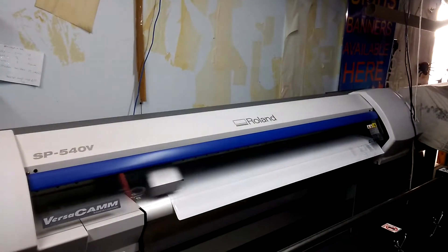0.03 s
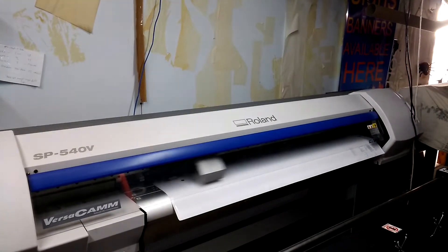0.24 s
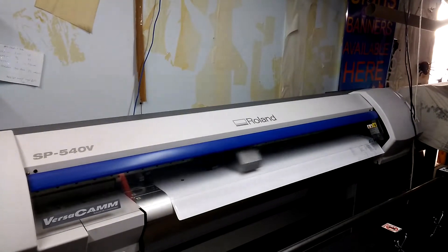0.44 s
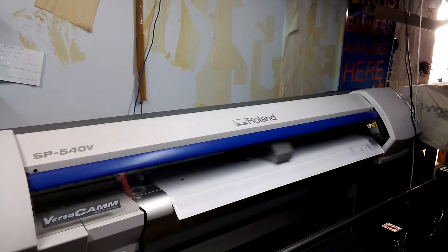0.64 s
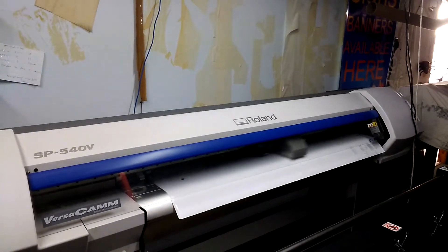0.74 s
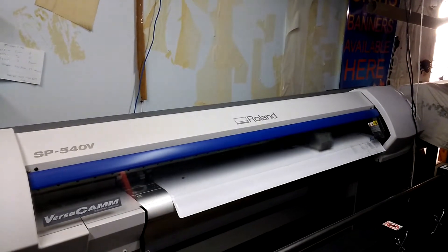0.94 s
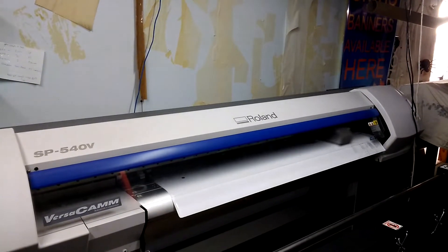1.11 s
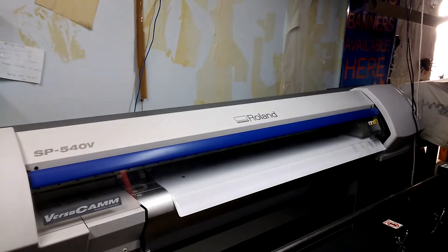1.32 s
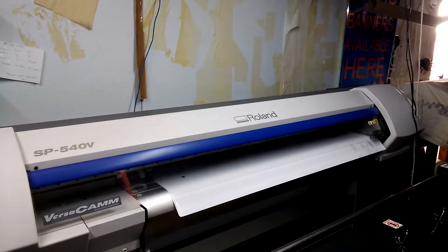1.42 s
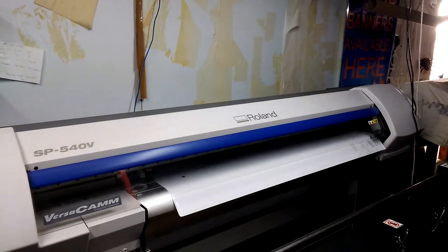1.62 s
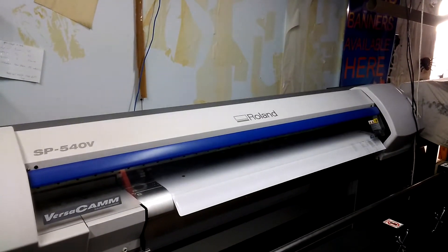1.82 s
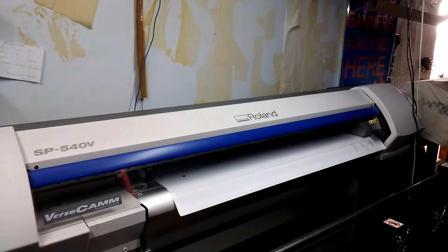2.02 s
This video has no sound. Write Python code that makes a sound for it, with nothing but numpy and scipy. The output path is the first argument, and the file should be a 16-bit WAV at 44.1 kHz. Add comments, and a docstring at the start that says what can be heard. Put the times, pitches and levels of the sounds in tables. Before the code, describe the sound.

Large-format printer carriage sweeping with rough whir and thin whine, stopping shortly before its next pass

```python
"""The carriage of a wide-format inkjet printer runs along its rail, brakes, rests briefly and sets off again.
Its bearings are shaped noise; belt and gears add a rough whir that rings in the housing, and a faint gear whine
of two tones swells at every turn of the pulley. Panels drone in short wavering tones as the carriage passes.
Around the pause the media feed motor blips, then the carriage motor chirps upward as it spins up.
A quiet fan and the shop lie underneath; the left and right microphones hear each source differently."""
import sys
import numpy as np
from scipy import signal
from scipy.fft import rfft, irfft, next_fast_len
from scipy.io import wavfile

SR = 44100
rng = np.random.default_rng(int(sys.argv[2]) if len(sys.argv) > 2 else 0)


def output_pcm(signal):
    """Save a mono or channel-first signal as 16-bit PCM at the path in sys.argv[1].

    Samples are clipped to [-1, 1] before scaling.
    """
    pcm = np.clip(np.atleast_2d(signal).T, -1, 1) * 32767
    wavfile.write(sys.argv[1], SR, np.round(pcm).astype(np.int16))


N = 90713
T = np.arange(N) / SR
BINS = np.fft.rfftfreq(N, 1 / SR)


def from_db(db):
    """Decibels to amplitude gain."""
    return 10 ** (np.asarray(db) / 20)


def rms_one(x):
    """Scale to unit power."""
    return x / np.sqrt(np.mean(x ** 2) + 1e-20)


def in_time(rows):
    """A control curve at every sample."""
    return np.interp(T, *np.transpose(rows))


def over_bins(rows):
    """The columns of a frequency table at every bin, joined along log frequency."""
    hz, *columns = np.transpose(rows)
    return np.array([np.interp(np.log(BINS + 1), np.log(hz), column) for column in columns])


def drift(rate_hz):
    """Slow random wander with a spread of one: noise whose parts faster than the rate are weakened."""
    size = next_fast_len(N, real=True)
    hz = np.fft.rfftfreq(size, 1 / SR)
    smooth = rfft(rng.standard_normal(size)) / (1 + (hz / rate_hz) ** 2)
    return rms_one(irfft(smooth, size)[:N])


def swell(centre_s, length_s):
    """A smooth rise and fall, half as strong in power at the ends of its length."""
    return .5 ** (2 * ((T - centre_s) / length_s) ** 2)


# How alike the room makes noise at the two microphones.
# Each row: frequency in Hz, left-right correlation (-1 to 1).
LIKENESS = [(60, -0.87), (110, -0.93), (200, -0.97), (380, -0.64), (700, -0.67), (1290, 0.043),
            (2380, -0.11), (4400, 0.013), (8120, -0.074), (15000, 0.023)]


def stereo_noise(gain):
    """Noise of the given amplitude per root Hz; shared and opposed parts set the left-right correlation."""
    mid, side = rfft(rng.standard_normal((2, N)))
    alike = np.clip(over_bins(LIKENESS)[0], -.97, .97)
    shared = np.sqrt(1 + alike) * mid
    opposed = np.sqrt(1 - alike) * side * np.array([[1], [-1]])
    return irfft((shared + opposed) * gain, N) * np.sqrt(SR) / 2


def wavering_tone(hz, width_hz):
    """A sine of unit power whose pitch wanders with a spread of half the given width."""
    pitch_hz = hz + .5 * width_hz * drift(width_hz)
    return np.sqrt(2) * np.sin(2 * np.pi * np.cumsum(pitch_hz) / SR)


RIPPLE_DB, RIPPLE_DECAY_PER_S = 4, 56  # fine random ripple: depth, and how fast its noise dies out


def ripple():
    """Fine random ripple gives the hiss narrow dips and blunt peaks, different at each microphone."""
    fading_noise = rng.standard_normal((2, N)) * np.exp(-(T * RIPPLE_DECAY_PER_S) ** 2)
    colour = np.minimum(rms_one(rfft(fading_noise).real), 1)  # the cap blunts the peaks
    return rms_one(from_db(RIPPLE_DB * colour))


# Bearings rolling on the rail, before ripple and unevenness.
# Each row: frequency in Hz, left level in dB per Hz, right level in dB per Hz.
BEARING_HISS = [(900, -120, -120), (1850, -89.5, -94), (2460, -86, -85.5), (2870, -88.5, -88),
                (3240, -80.5, -83.5), (4070, -79.5, -82.5), (4530, -87, -87), (5320, -81, -86.5),
                (6120, -78, -86.5), (6850, -76, -98.5), (7360, -75.5, -82), (8600, -76.5, -90),
                (9900, -77.5, -86.5), (11260, -79, -94), (13100, -81, -90.5), (14100, -80.5, -96),
                (15800, -80.5, -104)]
HISS_GRAIN_DB, HISS_GRAIN_HZ = 0.28, 376
HISS_SWAY_DB, HISS_SWAY_HZ = 0.97, 6
LOW_HISS_SWAY_DB, LOW_HISS_SWAY_HZ = 1.25, 39.3  # extra unevenness of the lower hiss
# the drive pulls harder as it gathers speed
PULL_S, PULL_LENGTH_S = 2.01, 0.13
HISS_PULL_DB, HISS_PULL_TOP_HZ = 3, 5124


def bearings(travel_db):
    """Rolling makes a bright grainy hiss; its lower part is more uneven and grows while the drive pulls."""
    gain = from_db(over_bins(BEARING_HISS)) * ripple()
    low = BINS < HISS_PULL_TOP_HZ
    low_db = HISS_PULL_DB * swell(PULL_S, PULL_LENGTH_S) + LOW_HISS_SWAY_DB * drift(LOW_HISS_SWAY_HZ)
    hiss = stereo_noise(gain * low) * from_db(low_db) + stereo_noise(gain * ~low)
    uneven_db = HISS_GRAIN_DB * drift(HISS_GRAIN_HZ) + HISS_SWAY_DB * drift(HISS_SWAY_HZ)
    return hiss * from_db(travel_db + uneven_db)


def resonances(rows):
    """Power per Hz, left and right, of resonances that each spread their power around a peak."""
    power = 0
    for hz, width_hz, left_db, right_db in rows:
        peak = from_db([[left_db], [right_db]]) ** 2 * 2 / (np.pi * width_hz)
        power = power + peak / (1 + ((BINS - hz) / width_hz) ** 2) ** 2
    return power


# Broad whir of belt and gears, before load and throb.
# Each row: frequency in Hz, left level in dB per Hz, right level in dB per Hz.
WHIR = [(205, -112, -112), (423, -90, -95), (612, -83, -87.5), (790, -88, -95), (990, -82.5, -88.5),
        (1183, -78.5, -79), (1290, -71, -80.5), (1600, -71, -77.5), (1660, -73.5, -81), (1820, -78, -86.5),
        (2020, -83, -84), (2330, -91, -87), (2720, -100, -103), (5100, -115, -115)]
# Ringing of the housing under the whir, before load and throb.
# Each row: frequency in Hz, width in Hz, left level in dB, right level in dB.
HOUSING = [(904, 49, -60, -75), (1063, 8.7, -58, -69), (1111, 7.9, -60.5, -66.5), (1260, 22, -56, -74),
           (1420, 14, -53, -58), (1490, 8.1, -53, -51.5), (1799, 16, -54.5, -66.5), (1934, 35, -54.5, -79),
           (2160, 20, -68, -60)]
# Load on the drive along the rail. Each row: time in seconds, extra level of the whir in dB.
WHIR_LOAD = [(0, 2.5), (.12, 1), (.35, 1), (.52, 2), (.72, -2.5), (.88, -1), (1.1, -1.5), (1.38, 1.5),
             (1.56, 0.5), (1.66, 1), (1.86, 4.5), (1.94, -5.5), (2.04, -3.5)]
# The lower part of the whir, which rises and falls on its own and dips deepest near 1.46 s.
# Each row: time in seconds, extra level in dB.
LOW_WHIR_LEVEL = [(0, 0), (.25, -2.5), (.55, -1), (.76, -1.5), (.88, 0), (1.1, -3), (1.3, -2.5), (1.46, -8),
                  (1.6, -0.5), (1.88, -1), (2.04, 0)]
LOW_WHIR_TOP_HZ, WHIR_PULL_DB = 1416, 5.5
WHIR_FOLLOWS = 0.98  # share of the travel's level changes, in dB
WHIR_ROUGH_DB, WHIR_ROUGH_HZ = 1.44, 66.6
PULLEY_WHIR_DB = 0.4  # up and down
COG_HZ, COG_DB = 35.5, -0.1  # level change at the cog rate, too small to hear


def drive(travel_db, pulley):
    """Belt and gears make a rough whir that rings in the housing, with a very slight throb at the pulley turn."""
    gain = np.sqrt(from_db(over_bins(WHIR)) ** 2 + resonances(HOUSING))
    low = BINS < LOW_WHIR_TOP_HZ
    whir = stereo_noise(gain * low) * from_db(in_time(LOW_WHIR_LEVEL)) + stereo_noise(gain * ~low)
    throb_db = PULLEY_WHIR_DB * pulley + COG_DB * np.sin(2 * np.pi * COG_HZ * T)
    rough_db = WHIR_ROUGH_DB * drift(WHIR_ROUGH_HZ)
    load_db = in_time(WHIR_LOAD) + WHIR_PULL_DB * swell(PULL_S, PULL_LENGTH_S)
    return whir * from_db(WHIR_FOLLOWS * travel_db + throb_db + rough_db + load_db)


# The gear whine, then its sideband one cog rate higher, before the swings in level.
# Each row: left level in dB, right level in dB.
WHINE_TONES = [(-51.5, -50), (-51, -63)]
# Strength of the whine along the rail. Each row: time in seconds, extra level in dB.
WHINE_LEVEL = [(0, -3), (.12, -2), (.3, 7.5), (.7, 0), (1.17, 1.5), (1.32, 3.5), (1.54, -7), (1.69, -6),
               (1.78, -11), (1.9, -7), (2.02, -7.5)]
WHINE_HZ, WHINE_WANDER_RAD, WHINE_WANDER_HZ = 1491, 0.25, 6
WHINE_RIGHT_OFFSET_HZ = -0.76  # pitch offset of the whine at the right microphone
IN_STEP_S = 0.99  # when the whine is in step at both microphones, apart from its wander
SIDEBAND_FOLLOWS = 0.51  # share of the swing along the rail that the sideband takes, in dB
WHINE_FOLLOWS = 0.99  # share of the travel's level changes, in dB
PULLEY_WHINE_DB = 2  # up and down


def whine(travel_db, pulley):
    """A gear tone beats with its steadier sideband; both swell once per pulley turn."""
    tones = np.zeros((2, N))
    wander = np.array([WHINE_WANDER_RAD * drift(WHINE_WANDER_HZ) for channel in range(2)])
    along_rail_db = in_time(WHINE_LEVEL)
    for k, (left_db, right_db) in enumerate(WHINE_TONES):
        channel_hz = WHINE_HZ + k * COG_HZ + np.array([[0], [WHINE_RIGHT_OFFSET_HZ]])
        phase = 2 * np.pi * (channel_hz * (T - IN_STEP_S) + rng.random()) + wander
        swing_db = along_rail_db * (SIDEBAND_FOLLOWS if k else 1)
        level = from_db([[left_db], [right_db]]) * from_db(swing_db)
        tones += level * np.sqrt(2) * np.sin(phase)
    return tones * from_db(WHINE_FOLLOWS * travel_db + PULLEY_WHINE_DB * pulley)


# Fan and shop, before the rumble's lumps.
# Each row: frequency in Hz, left level in dB per Hz, right level in dB per Hz.
FAN = [(25.6, -112, -112), (59, -91.5, -88.5), (98, -85, -88.5), (146, -91.5, -93), (187, -90, -94.5),
       (220, -96, -101), (330, -91, -92.5), (460, -93.5, -99), (606, -86.5, -92), (720, -93.5, -99),
       (1330, -101, -105), (1930, -100, -107), (2900, -108, -107), (3860, -108, -107), (5650, -115, -120),
       (8460, -118, -123), (15100, -135, -138)]
# Edges, in Hz, of the rumble bands that swell and sink separately.
FAN_LUMP_EDGES_HZ = [0, 135, 270, 520]
FAN_LUMP_DB, FAN_LUMP_HZ = 4, 8.7


def fan():
    """Moving air makes a steady noise above a rumble whose bands swell and sink at random."""
    gain = from_db(over_bins(FAN))
    edges = FAN_LUMP_EDGES_HZ
    rumble = np.zeros((2, N))
    for low, high in zip(edges, edges[1:]):
        band = stereo_noise(gain * (BINS >= low) * (BINS < high))
        rumble += band * from_db(FAN_LUMP_DB * drift(FAN_LUMP_HZ))
    return rumble + stereo_noise(gain * (BINS >= edges[-1]))


# Panels set droning by the passing carriage.
# Each row: centre in seconds, length in seconds, pitch in Hz, width of its wander in Hz,
# left level in dB before roughness.
DRONES = [(.04, .02, 358, 17, -49), (0.122, 0.081, 356, 7.1, -50.5), (0.13, 0.1, 411.6, 47, -52.5),
          (0.214, 0.031, 358, 17, -58), (0.297, 0.051, 358, 7.2, -57), (0.382, 0.014, 360, 12, -55.5),
          (0.473, 0.061, 356, 13, -64), (0.829, .02, 360, 20, -59.5), (0.164, 0.031, 99.7, 10, -62),
          (0.21, 0.037, 99.5, 10, -57.5), (0.262, 0.011, 89.2, 12, -48), (0.308, .03, 112.6, 24, -63),
          (.6, 0.021, 197, 15, -64.5), (.745, 0.021, 98, 8.4, -66), (1.297, 0.046, 113.3, 9.5, -67),
          (.045, .056, 698.5, 370, -52.5), (0.246, 0.023, 715, 16, -57.5), (0.246, 0.025, 855, 9.9, -55),
          (0.146, 0.022, 915, 12, -49), (0.27, .035, 902, 9.1, -50), (.833, .03, 873, 6.3, -52.5),
          (0.98, 0.048, 904, 6.3, -48.5), (1.045, .03, 912, 5.2, -55), (1.117, 0.021, 915, 6.9, -43),
          (1.471, 0.033, 501, 7.3, -57.5), (1.545, 0.028, 895, 14, -53), (1.68, .045, 1505, 7.9, -64),
          (2.012, 0.075, 913, 8.7, -47.5)]
DRONE_ROUGH_DB, DRONE_ROUGH_HZ, DRONE_RIGHT_DB = 2.6, 45.4, -11


def panels():
    """Covers drone briefly and roughly, in opposite phase and weaker at the right microphone."""
    drone = np.zeros(N)
    for centre_s, length_s, hz, width_hz, db in DRONES:
        level = from_db(db + DRONE_ROUGH_DB * drift(DRONE_ROUGH_HZ)) * swell(centre_s, length_s)
        drone += level * wavering_tone(hz, width_hz)
    return drone * np.array([[1], [-from_db(DRONE_RIGHT_DB)]])


# Blips of the media feed motor.
# Each row: centre in seconds, length in seconds, left level in dB.
FEED = [(1.347, 0.02, -54.5), (1.697, 0.066, -66), (1.764, 0.015, -54), (1.832, 0.0063, -56)]
FEED_HZ, FEED_WIDTH_HZ, FEED_RIGHT_DB = 610, 29, -11.5


def feed():
    """The feed motor blips softly on one wavering pitch, in opposite phase at the two microphones."""
    level = sum(from_db(db) * swell(centre_s, length_s) for centre_s, length_s, db in FEED)
    return level * wavering_tone(FEED_HZ, FEED_WIDTH_HZ) * np.array([[1], [-from_db(FEED_RIGHT_DB)]])


START_S, START_LENGTH_S = 1.889, 0.0251
START_HZ, START_RISE_HZ_PER_S, START_WIDTH_HZ = 1300, 3150, 23  # pitch at the centre, rise, wander
START_DB, START_RIGHT_DB = -47.5, -18  # left level, right relative to left


def spin_up():
    """The carriage motor spins up as it sets off: a short chirp of rising pitch."""
    since_centre_s = np.clip(T - START_S, -START_LENGTH_S, START_LENGTH_S)
    hz = START_HZ + START_RISE_HZ_PER_S * since_centre_s
    chirp = swell(START_S, START_LENGTH_S) * wavering_tone(hz, START_WIDTH_HZ)
    return from_db(START_DB) * chirp * from_db([[0], [START_RIGHT_DB]])


# Carriage travel, as the level of its rolling hiss; only its distance from CRUISE_DB counts.
# Each row: time in seconds, level in dB.
TRAVEL = [(0, -47), (.04, -44), (.14, -44), (.27, -44.5), (.35, -44.5), (.6, -44.5), (.7, -43.5),
          (.84, -43), (.92, -44.5), (.98, -43.5), (1.11, -44), (1.4, -45.5), (1.56, -44.5), (1.6, -45.5),
          (1.68, -66), (1.75, -88), (1.81, -95), (1.835, -87), (1.878, -54), (1.9, -47.5), (1.96, -45),
          (2.04, -44.5)]
CRUISE_DB = -44
PULLEY_TURN_S, PULLEY_PEAK_S = 0.1532, 0.12


def scene():
    """The carriage's travel drives hiss, whir and whine together; the pulley's turn sways the last two."""
    travel_db = in_time(TRAVEL) - CRUISE_DB
    pulley = np.cos(2 * np.pi * (T - PULLEY_PEAK_S) / PULLEY_TURN_S)
    carriage = bearings(travel_db) + drive(travel_db, pulley) + whine(travel_db, pulley)
    return carriage + fan() + panels() + feed() + spin_up()


def record(dry):
    """A steep elliptic low-pass cuts the top of both channels."""
    cutoff_hz = 15780
    low_pass = signal.ellip(12, .1, 80, cutoff_hz, fs=SR, output="sos")  # ripple and stopband in dB
    return signal.sosfilt(low_pass, dry)


dry = scene()
out = record(dry)
output_pcm(out)
```